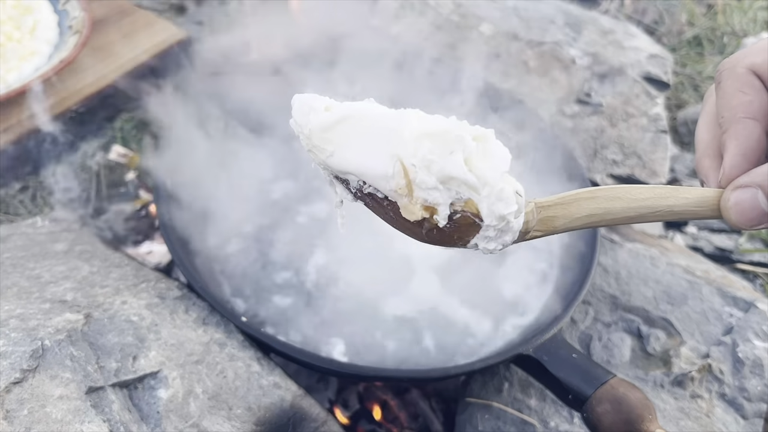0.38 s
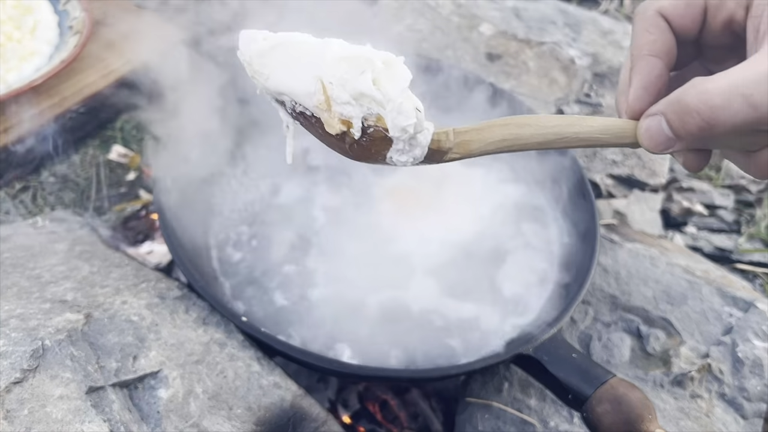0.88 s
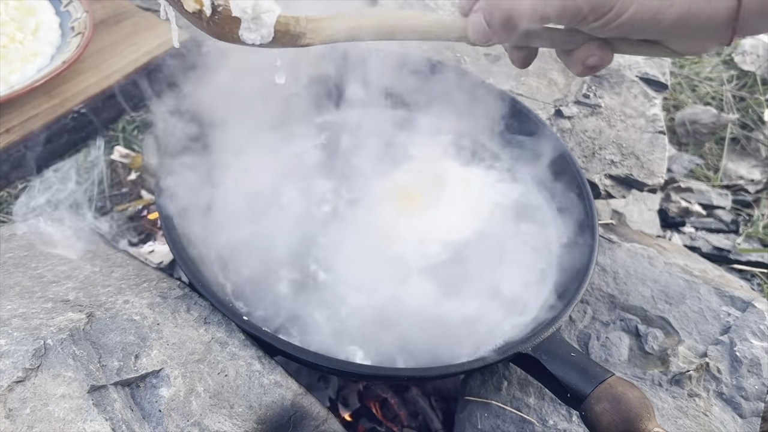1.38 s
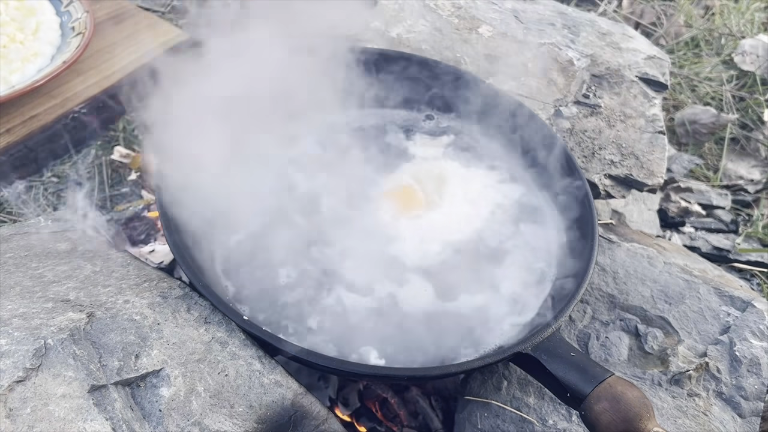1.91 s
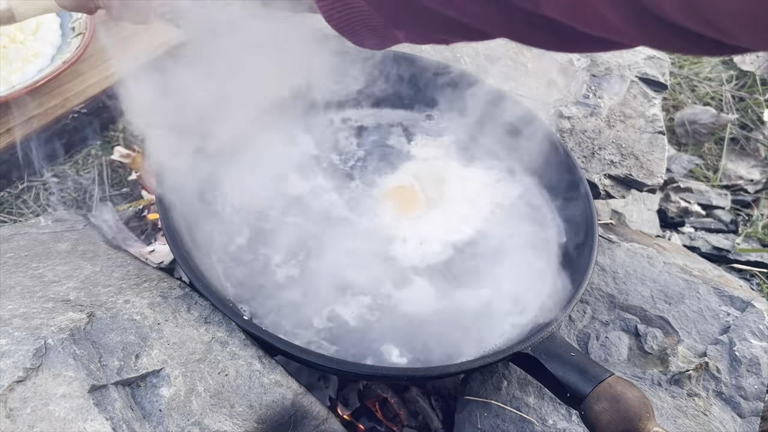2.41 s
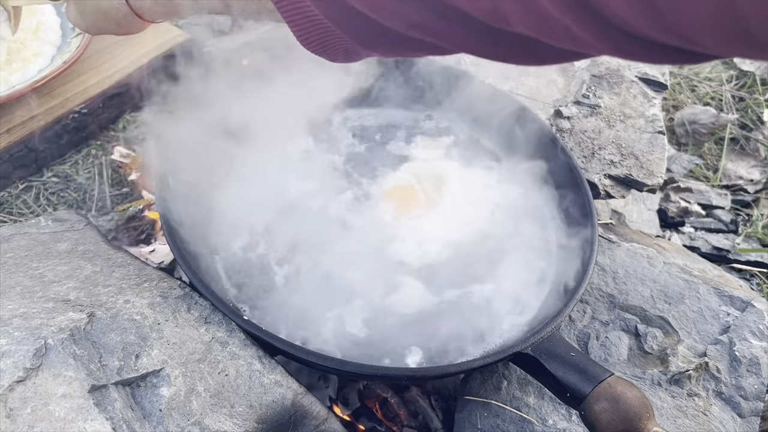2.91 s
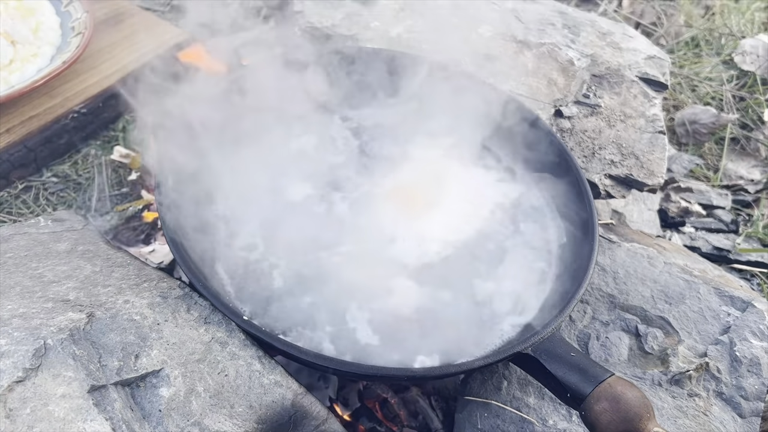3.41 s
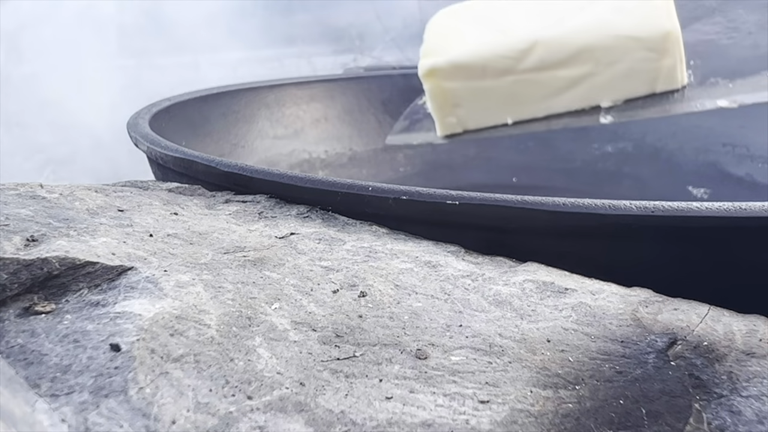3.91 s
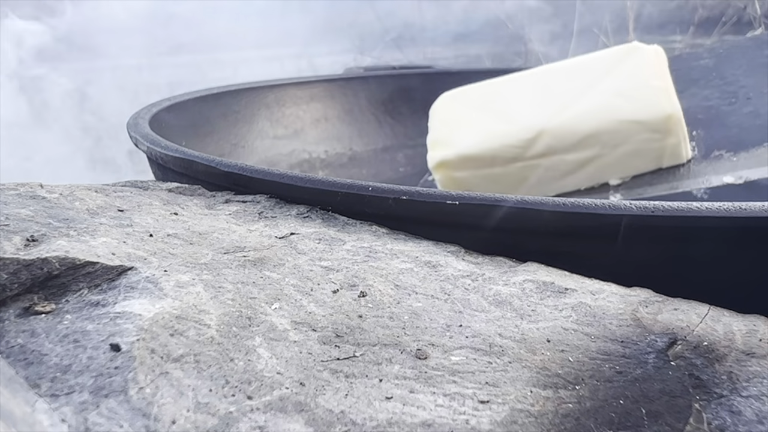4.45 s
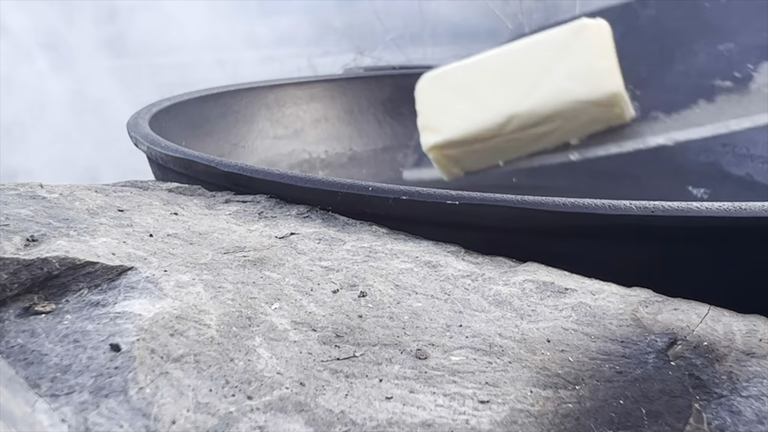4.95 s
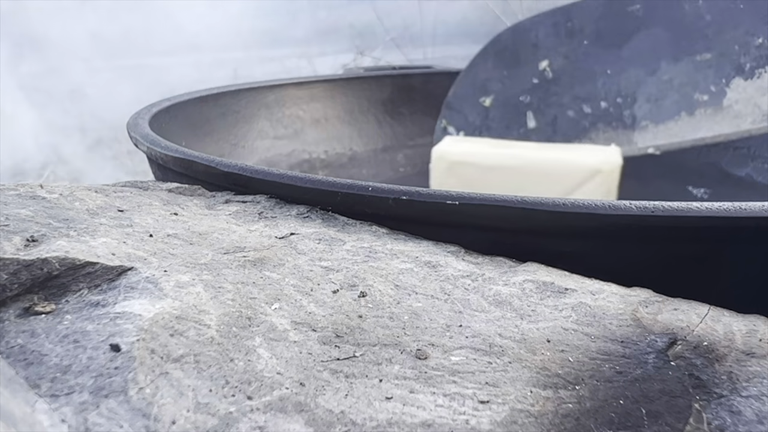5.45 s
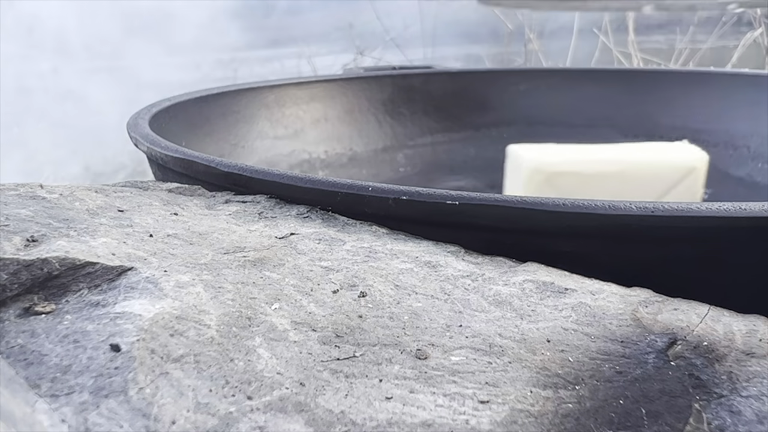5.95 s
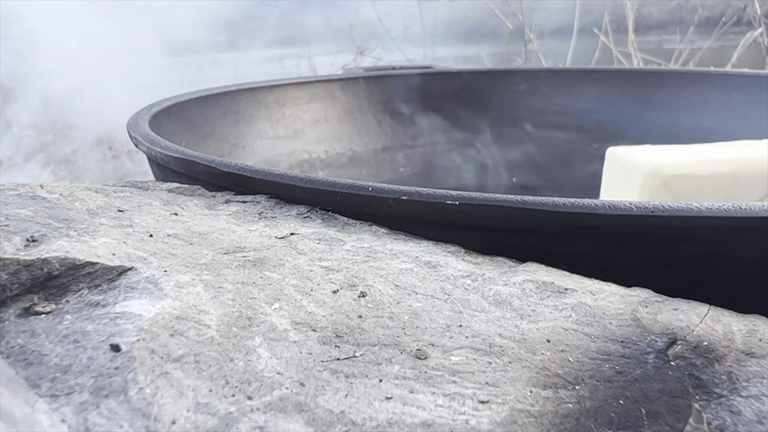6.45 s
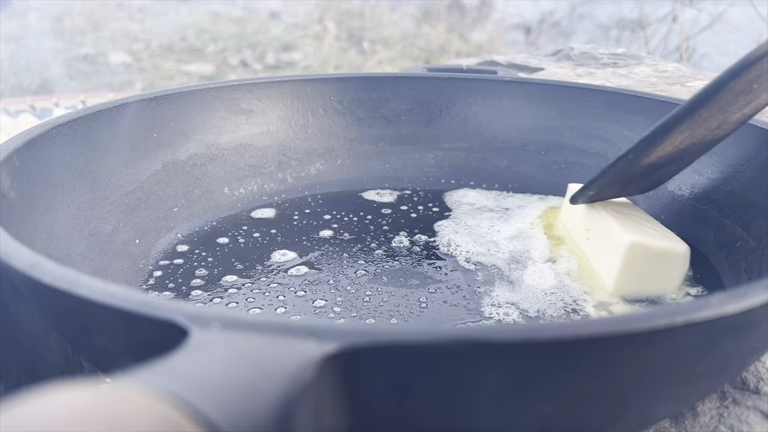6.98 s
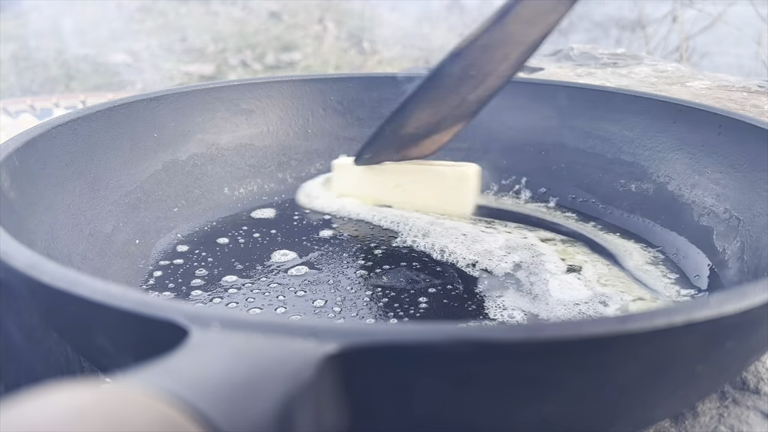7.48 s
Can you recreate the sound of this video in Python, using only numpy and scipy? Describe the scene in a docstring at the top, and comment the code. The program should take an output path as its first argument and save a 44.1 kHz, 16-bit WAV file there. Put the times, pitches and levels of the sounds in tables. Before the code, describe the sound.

Outdoors over a fire, water simmers in an iron pan with broad steamy hiss, soft roar and low distant engine hum. One loud sharp crack pops early. The sound then drops to a much quieter close view: butter and knife knock the iron with a short metallic ring and quick scrape, followed by tiny ticks and faint sizzling. A final cut brings slightly growing frying and one firm pop.

```python
"""A cast-iron pan over an outdoor fire, in three shots: water simmers and steams, then a knife lets a block
of butter drop and scrapes away, and the butter sizzles. Steam and frying are spitting shaped noise; butter,
blade and scrape excite damped modes. The fire is soft roaring noise with cracks (noise bursts over dull
knocks) and small blips. Behind lie rumble, open-air hiss and gliding engine tones."""
import sys
import numpy as np
from scipy import signal
from scipy.fft import rfft, irfft, next_fast_len
from scipy.io import wavfile
from scipy.ndimage import map_coordinates

SR = 44100
rng = np.random.default_rng(int(sys.argv[2]) if len(sys.argv) > 2 else 0)


def natural_amplitude(level_db):
    """Convert a level in decibels to a linear amplitude factor, elementwise."""
    exponent = np.asarray(level_db, float) / 20
    return 10 ** exponent


def pcm_store(signal):
    """Save signal as 16-bit PCM."""
    levels = np.round(np.clip(np.atleast_2d(signal), -1, 1) * 32767)
    wavfile.write(sys.argv[1], SR, levels.astype(np.int16).T)


N = 335160

# Silence between the first two shots: start in seconds, end in seconds.
GAP_S = (3.5255, 3.5385)
# Noise spectra, shape only. Each row: frequency in Hz, density in dB per Hz.
RUMBLE_SPECTRUM = [(25, -44.5), (38, -7), (52, -2), (75, -7.5), (110, -6.5), (170, -11.5), (240, -20),
                   (330, -23.5), (500, -63)]
# Fire roar and pan hiss, one such spectrum a shot. Each row: frequency in Hz, density in dB per Hz.
ROAR_SPECTRA = [
    [(150, -33.5), (250, -5), (440, -4), (720, -0.5), (1590, -6.5), (1840, -6), (2380, -11.5),
     (3010, -11.5), (3700, -31), (5000, -46)],
    [(150, -33), (250, -4.5), (400, 1.5), (700, -1.5), (1000, -4.5), (1740, -4.5), (2500, -10.5),
     (3500, -34.5), (5000, -57.5)],
    [(150, -26.5), (250, -6.5), (420, 0.5), (700, -8.5), (1200, -12), (2000, -10.5), (3000, -18.5),
     (3600, -24), (5000, -59)],
]
HISS_SPECTRA = [
    [(1800, -30.5), (3000, -10), (3850, -5), (6000, -2), (8140, -1), (9500, -5.5), (11500, -1.5),
     (13000, -10.5), (15100, -4), (15850, -3), (16000, -64)],
    [(1800, -33), (3000, -5), (3600, -7.5), (4800, -2.5), (6600, 0), (7900, -3), (9130, -2), (11600, -14.5),
     (13000, -33), (15100, -11), (15850, -5), (16000, -61)],
    [(1800, -22), (3000, -1.5), (5050, -6.5), (7370, -10), (9000, -12.5), (12100, -23.5), (15100, -26),
     (15850, -30), (16000, -59)],
]
# Far, smooth hiss of the open air. Each row: frequency in Hz, density in dB per Hz.
AIR_SPECTRUM = [(2000, -27.5), (3000, -6), (3640, -13), (4650, -5.5), (5600, -20), (9500, -21.5),
                (11700, -23.5), (12700, -23), (13000, -68)]
# Left-right likeness of the noises. Each row: frequency in Hz, correlation from -1 to 1.
STEREO_LIKENESS = [(60, 0.95), (150, 0.95), (380, 0.67), (950, 0.58), (2380, 0.26), (5980, 0.75),
                   (15000, -0.283)]
# Stereo balance. Each row: frequency in Hz, left minus right in dB.
STEREO_LEAN_DB = [(60, 0.5), (150, -2.5), (380, 0.5), (950, 2.5), (2380, 3), (5980, 4), (15000, -2)]
# Far engine tones. Each row: start in seconds, end in seconds, start pitch in Hz, end pitch in Hz, level in dB.
HUM_GLIDES = [(0, 1.2, 58, 52, -51), (1.6, 3.5, 54, 52, -47.5), (0, 2.4, 59, 66.3, -52.5),
              (0, 3.5, 107.5, 98, -54.5), (2.3, 3.54, 134, 133, -62.5), (0, 3.5, 171, 164.5, -63),
              (3.5, 7.01, 50.6, 50.2, -52.5), (3, 4.6, 68, 68, -53.5), (4, 4.2, 80, 77, -54),
              (4.5, 5.1, 75, 72, -58), (5, 5.6, 51, 63, -46.5), (5, 7.01, 68, 70.5, -52),
              (6.3, 7.0, 64, 66.5, -55), (5, 7.01, 139, 142.5, -70), (7, 7.7, 76, 80.5, -50)]
# Fire and fat cracks. Each row: time in seconds, nominal level in dB, knock relative to burst in nominal dB,
# treble centre in Hz.
CRACK_EVENTS = [(1.4431, -7, -24.5, 6540), (2.0832, -32.5, -27, 8050), (4.5196, -52, 2, 11550),
                (5.1399, -54, -4.5, 7190), (6.2023, -49.5, -6, 6742), (6.3463, -48, -16, 7500),
                (6.6156, -45.5, -7, 6180), (6.9473, -53, -9, 4310), (7.0095, -49, -23, 3935),
                (7.0242, -47, -23, 4990), (7.167, -49, -2, 3180), (7.186, -52, -6, 2600),
                (7.2948, -54, -10.5, 6070), (7.367, -54.5, -1, 3860), (7.4535, -26, -3, 4590)]
# Dull blips from embers and fat. Each row: time in seconds, nominal level in dB, nominal pitch in Hz.
BLIP_EVENTS = [(3.835, -46.5, 537), (3.942, -44, 1900), (4.131, -48, 743), (4.55, -39.5, 1722),
               (4.715, -50, 721), (5.65, -46, 725), (6.12, -43, 2010), (6.366, -48, 1500),
               (6.42, -46.5, 357), (6.493, -45, 1800), (6.541, -48, 1150)]
# Mode tables: after-ring of the big crack, knife blade, pan. Each row: frequency in Hz, level in dB,
# t60 in seconds.
THUMP_MODES = [(75, -25.5, 0.068), (133, -22.5, .2), (187, -19.5, 0.099), (264, -20, 0.059),
               (373, -6.5, 0.026), (563, -4.5, 0.0074), (1490, -1.5, 0.0078), (1900, -3.5, 0.008),
               (3790, -12, 0.012), (6400, -7.5, 0.011), (11560, -9.5, 0.0084), (15300, -12.5, .01)]
BLADE_MODES = [(578, -3, 0.16), (634, -11, 0.15), (1168, -3, .14), (1098, -23, 0.17), (1873, -15, 0.14),
               (2272, -11, 0.42), (3171, -17, 0.09), (4250, -31, .12), (5669, -31, .12)]
PAN_MODES = [(232, 0.5, 0.038), (268, -5.5, 0.1), (427, 7, 0.051), (506, 5, 0.052), (786, 0.5, 0.044),
             (1234, -2, 0.027), (2770, -27, 0.056), (3800, -46, .03), (4130, -33, 0.074),
             (5160, -26, 0.064), (5560, -27.5, 0.08), (6880, -36, 0.092), (8550, -36, 0.063)]
# Blows on the pan. Each row: time in seconds, pan level in dB, blade level in dB.
BLOWS = [(5.251, -45, -66), (5.267, -21.5, -22), (5.284, -39.5, -37.5), (5.403, -24.5, -57),
         (5.444, -36.5, -66), (5.471, -34, -62), (5.490, -45, -40)]
# Scrape: start, rise, hold, release, all in seconds.
SCRAPE_S = (5.425, 0.026, 0.046, 0.022)
# Dark gaps in the treble. Each row: centre in Hz, half width in Hz, depth in dB.
TREBLE_DIPS = [(10120, 340, -28), (13800, 640, -34)]
# Cracks reach the left port first. Each row: frequency in Hz, left lead in radians.
LEFT_LEAD_RAD = [(60, 0.5), (1500, 1), (2400, 1), (4000, -1.4), (7000, 1.14), (9500, 2.5), (16000, 2)]
# Each row is a shot: rumble in dB, roar in dB, dB of roar per dB of pan activity, spit depth in dB.
SHOTS = [(-50.5, -51, 0.2549, 1.5), (-56.5, -59.5, 0.05, 2.5), (-60.5, -61, 0.7, 3.5)]
# How hard the pan boils or fries, one table a shot. Each row: time in seconds, hiss in dB.
PAN_ACTIVITY = [
    [(0, -57.5), (1.1, -56), (1.25, -50.5), (1.7, -54.5), (1.8, -55.5), (2, -52), (2.2, -52.5), (2.4, -50),
     (3.05, -49.5), (3.25, -52), (3.5, -49.5)],
    [(3.56, -86), (5.1, -87), (5.25, -72), (5.55, -71.5), (5.8, -69), (6.45, -65.5), (7.01, -72)],
    [(7.04, -72), (7.42, -68.5), (7.6, -64.5)],
]
# Flurries of spitting fat swell roar and ticks. Each row: centre in seconds, half length in seconds,
# swell in dB.
FLURRIES = [(5.39, .13, 6), (6.376, .025, 5), (6.498, .015, 4.5), (6.547, 0.011, 7), (6.75, .012, 4)]

AIR_DB = -79.5
HUM_FADE_S, HUM_WAVER_DB, HUM_DRIFT_HZ = 0.12, 2.2, 0.67
KNOCK_HZ = 844  # nominal, under a crack
SPUTTER_FROM_S, SPUTTER_DB, SPUTTER_CLUMP_DB = 3.56, -66, 1.5  # small random ticks
BLADE_PRESSED_S, BLADE_PRESSED_T60_S = 5.41, 0.15  # blade meets the iron again, its ring is stifled
SCRAPE_BODY_DB, GRIT_DB, GRIT_GROWTH_DB, SLIPS_PER_S = -38.5, -60.5, 10.5, 700


def unit(x):
    """Scaled to rms 1."""
    return x / np.sqrt(np.mean(x ** 2) + 1e-20)


def along(points, hz):
    """Values of (Hz, value) points, interpolated on a log frequency axis."""
    f, v = np.transpose(points)
    return np.interp(np.log(hz + 1), np.log(f + 1), v)


def curves(rows):
    """A mask of the table's time span, then one value per sample for each column."""
    s, *cols = np.transpose(rows)
    t = np.arange(N) / SR
    opening = np.clip((t - s[0] + 0.03) / 0.01, 0, 1)
    closing = np.clip((s[-1] + 0.03 - t) / 0.01, 0, 1)
    return [opening * closing] + [np.interp(t, s, c) for c in cols]


def wobble(knots_per_s):
    """A smooth random curve through normally distributed knots."""
    knots = rng.standard_normal(int(N * knots_per_s / SR) + 4)
    return map_coordinates(knots, [np.arange(N) * knots_per_s / SR])


def filtered(x, response):
    """x times a complex response of frequency."""
    m = next_fast_len(N + SR // 2)
    return irfft(rfft(x, m) * response(np.fft.rfftfreq(m, 1 / SR)), m)[..., :N]


def rush(spectrum, grain_db=0., grain_per_s=300):
    """Stereo noise of rms 1; grain_db makes it spit in tiny bursts shared by both sides."""
    pair = rng.standard_normal((2, N)) * natural_amplitude(grain_db * wobble(grain_per_s))

    def mid_side(hz):
        angle = np.arccos(np.clip(along(STEREO_LIKENESS, hz), -1, 1)) / 2
        return natural_amplitude(along(spectrum, hz)) * [np.cos(angle), np.sin(angle)]

    mid, side = filtered(pair, mid_side)
    return unit(np.array([mid + side, mid - side]))


def ring(modes, t, scatter_db=0):
    """Sum of damped modes struck at t = 0, levels randomly scattered."""
    return sum(natural_amplitude(db + rng.normal(0, scatter_db) - 60 * t / t60_s) * np.sin(2 * np.pi * hz * t)
               for hz, db, t60_s in modes)


def blip(hz, cycles, t):
    """A few cycles of falling pitch that swell and die; peak near 1."""
    u = t * hz / cycles
    envelope = np.e * u * np.exp(-u)
    return envelope * np.sin(2 * np.pi * hz * t * (1.15 - 0.034 * np.minimum(u, 5)))


def flurry_swell_db(t):
    """The dB that the flurries add at times t."""
    return sum(db * np.exp(-((t - s) / half_s) ** 2) for s, half_s, db in FLURRIES)


def add(out, s, sound):
    """Places a sound at time s."""
    at = round(s * SR)
    out[at:at + len(sound)] += sound


def open_air():
    """Steady, smooth far hiss from shaped noise."""
    return natural_amplitude(AIR_DB) * rush(AIR_SPECTRUM)


def engine_hum():
    """Far engine tones glide in pitch, fade in and out and waver in level."""
    out, t = np.zeros(N), np.arange(N) / SR
    for start, end, from_hz, to_hz, db in HUM_GLIDES:
        hz = np.interp(t, [start, end], [from_hz, to_hz]) + HUM_DRIFT_HZ * wobble(5)
        fade = np.clip(np.minimum(t - start + 0.03, end + 0.024 - t) / HUM_FADE_S, 0, 1)
        phase = 2 * np.pi * (np.cumsum(hz) / SR + rng.random())
        level = np.sqrt(2) * natural_amplitude(db + HUM_WAVER_DB * wobble(5))
        out += fade * level * np.sin(phase)
    return out


def low_rumble():
    """One slowly wavering low noise, its level set shot by shot."""
    level = np.zeros(N)
    for rows, (rumble_db, *_) in zip(PAN_ACTIVITY, SHOTS):
        level += curves(rows)[0] * natural_amplitude(rumble_db)
    return level * natural_amplitude(1.5 * wobble(6.9)) * rush(RUMBLE_SPECTRUM)


def cracks():
    """Each crack is a decaying noise burst over a dull knock; louder ones last longer, the strongest thumps."""
    out, t = np.zeros(N + SR), np.arange(SR // 4) / SR
    short_t = t[:1300]
    for s, db, knock_db, hz in CRACK_EVENTS:
        decay_s = 0.0066 * natural_amplitude(db / 8)  # time to fall 30 dB
        burst = rng.standard_normal(1300) * natural_amplitude(-30 * short_t / decay_s)
        edges_hz = [hz / 1.6, min(hz * 2.2, 15800)]
        band = signal.butter(2, edges_hz, "bandpass", fs=SR, output="sos")
        bright = signal.sosfilt(band, burst)
        bright /= abs(bright).max()
        knock = blip(KNOCK_HZ * natural_amplitude(rng.normal(0, 1)), 0.45, short_t)
        knock /= abs(knock).max()
        add(out, s + 0.00025, natural_amplitude(db + 3.0) * (bright + natural_amplitude(knock_db - 1.0) * knock))
        if db > -15:
            add(out, s + 0.00039, natural_amplitude(db) * ring(THUMP_MODES, t, scatter_db=2.2))
    fire = out[:N]
    sides = np.array([[0.5], [-0.5]])  # left is louder and earlier
    return filtered(fire, lambda hz: natural_amplitude(0.93 * sides) * np.exp(1j * sides * along(LEFT_LEAD_RAD, hz)))


def blips():
    """The clearest blips, over many small ones at random moments, pitches and lengths that come in clumps."""
    out, t = np.zeros(N + SR), np.arange(SR // 40) / SR
    for s, db, hz in BLIP_EVENTS:
        add(out, s - 0.002, natural_amplitude(db - 2.5) * blip(hz, 2.2, t))
    clump_db = SPUTTER_CLUMP_DB * wobble(3.8)
    for place, chance, tone, length in rng.random(size=(600, 4)):
        when = SPUTTER_FROM_S + place * (N / SR - SPUTTER_FROM_S) * 0.999
        octaves = 2.8 * (tone - 0.5)
        size_db = min(-3 * np.log(1 - chance), 8) - 4.5 * octaves - 2 * octaves ** 2
        db = SPUTTER_DB + flurry_swell_db(when) + clump_db[int(when * SR)] + size_db
        add(out, when, natural_amplitude(db) * blip(1300 * 2 ** octaves, 1 + 2 * length, t))
    return out[:N]


def grit_band():
    """Bandpass for the gritty noise of iron."""
    return signal.butter(3, [900, 6500], "bandpass", fs=SR, output="sos")


def knife_and_butter_blows():
    """Butter and blade strike the pan: pan modes with a noise tick, and blade modes stifled once pressed."""
    out, t = np.zeros(N + SR), np.arange(SR // 3) / SR
    for s, pan_db, blade_db in BLOWS:
        noise = signal.sosfilt(grit_band(), rng.standard_normal(len(t)))
        tick = 0.12 * natural_amplitude(-60 * t / 0.087) * noise
        pressed_s = np.maximum(s + t - max(s, BLADE_PRESSED_S), 0)
        stifled = natural_amplitude(-60 * pressed_s / BLADE_PRESSED_T60_S)
        pan = natural_amplitude(pan_db) * (ring(PAN_MODES, t, scatter_db=2) + tick)
        blade = natural_amplitude(blade_db) * stifled * ring(BLADE_MODES, t, scatter_db=1)
        add(out, s, (pan + blade) * (1 - np.exp(-t / 0.0019)))
    return out[:N]


def knife_scrape():
    """The blade drags over the iron in small random slips that excite the pan modes, ever brighter."""
    t = np.arange(SR // 3) / SR
    start, rise, hold, release = SCRAPE_S
    since = np.arange(N) / SR - start
    pressure = np.interp(since, np.cumsum([0, rise, hold, release]), [0, 1, 1, 0]) ** 2
    slips = rng.standard_normal(N) * ((rng.random(N) < SLIPS_PER_S / SR) + 0.03)
    low_ring = ring(PAN_MODES[:6], t) * natural_amplitude(-60 * t / 0.05)
    low = unit(signal.fftconvolve(slips, low_ring)[:N])
    high = unit(signal.fftconvolve(slips, ring(PAN_MODES[6:], t))[:N])
    rough = slips * 0.5 + 0.076 * rng.standard_normal(N)
    grit = unit(signal.sosfilt(grit_band(), rough))
    bright = unit(high + 0.66 * grit)
    bright_db = GRIT_DB + GRIT_GROWTH_DB * np.clip(since / (rise + hold), 0, 1)
    return pressure * (natural_amplitude(SCRAPE_BODY_DB) * low + natural_amplitude(bright_db) * bright)


def fire_and_pan():
    """Fire roar and the hiss of steam or frying fat, shot by shot; a busier pan also roars more."""
    out = np.zeros((2, N))
    flutter, surge = wobble(19), wobble(13)
    flurry_db = flurry_swell_db(np.arange(N) / SR)
    for rows, roar, hiss, shot in zip(PAN_ACTIVITY, ROAR_SPECTRA, HISS_SPECTRA, SHOTS):
        _, roar_db, share, spit_db = shot
        span, hiss_db = curves(rows)
        activity_db = hiss_db - hiss_db[span > 0].mean()
        busy_db = share * activity_db + flurry_db + 0.8 * wobble(2.8)
        roar_level = natural_amplitude(roar_db + busy_db + 0.65 * flutter)
        hiss_level = natural_amplitude(hiss_db + 0.5 * flutter + 0.55 * surge)
        out += span * roar_level * rush(roar, grain_db=1.0, grain_per_s=130)
        out += span * hiss_level * rush(hiss, grain_db=spit_db, grain_per_s=400)
    return out


def scene():
    """The noises surround the listener; cracks lean left; hum, blips and knife start out centred."""
    background = open_air() + engine_hum() + low_rumble()
    knife = knife_and_butter_blows() + knife_scrape()
    return background + cracks() + blips() + knife + fire_and_pan()


def top_cut(x):
    """Nothing passes above the cut-off."""
    return signal.sosfilt(signal.butter(12, 16830, fs=SR, output="sos"), x)


def record(dry):
    """The recorder cuts the deepest bass and delays low tones by a cycle or so: clicks sweep downwards."""
    def lag(hz):
        cycles = 1.3
        turns = np.log(np.maximum(hz, 70) / 70) + np.minimum(hz / 70, 1) - hz / 20000
        return np.exp(-2j * np.pi * cycles * turns)

    def colour(hz):
        dips_db = sum(db * np.exp(-((hz - centre) / width) ** 4) for centre, width, db in TREBLE_DIPS)
        lean_db = along(STEREO_LEAN_DB, hz) * [[0.5], [-0.5]]
        bass_cut = hz ** 4 / (hz ** 4 + 38 ** 4)
        return natural_amplitude(dips_db + lean_db) * bass_cut

    t = np.arange(N) / SR
    gate = (t < GAP_S[0]) | (t > GAP_S[1])
    mix = filtered(dry, lambda hz: lag(hz) * colour(hz)) * gate
    return top_cut(mix)


dry = scene()
out = record(dry)
pcm_store(out)
```